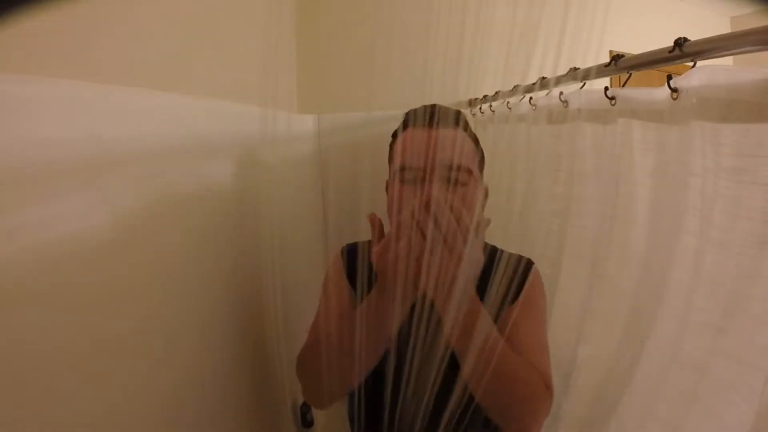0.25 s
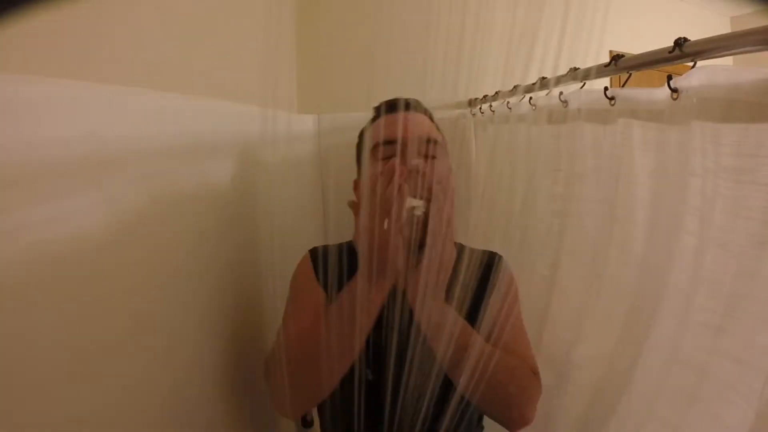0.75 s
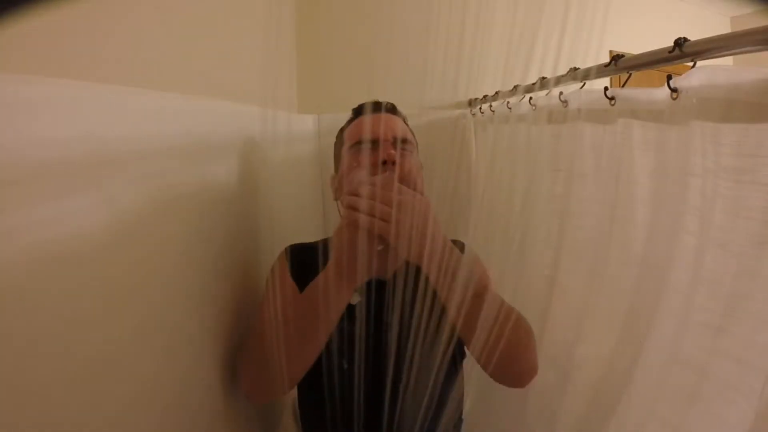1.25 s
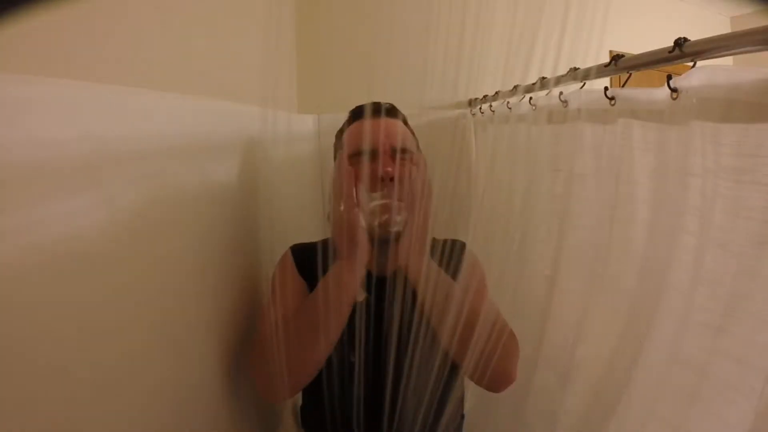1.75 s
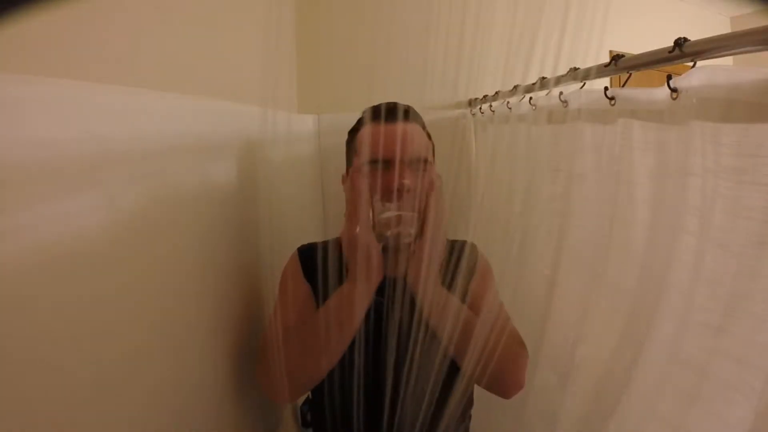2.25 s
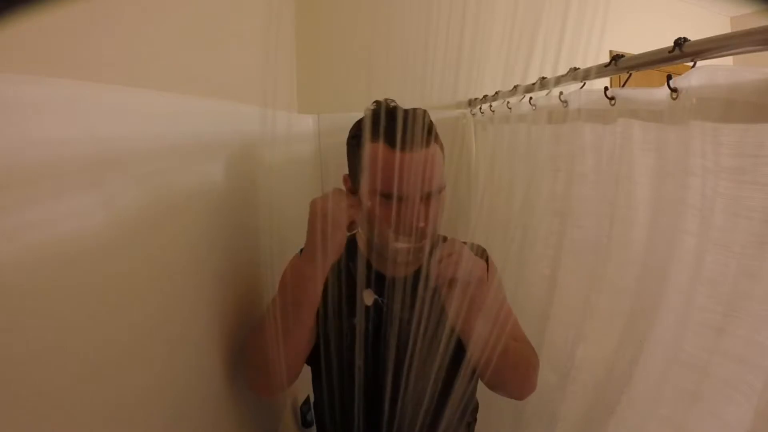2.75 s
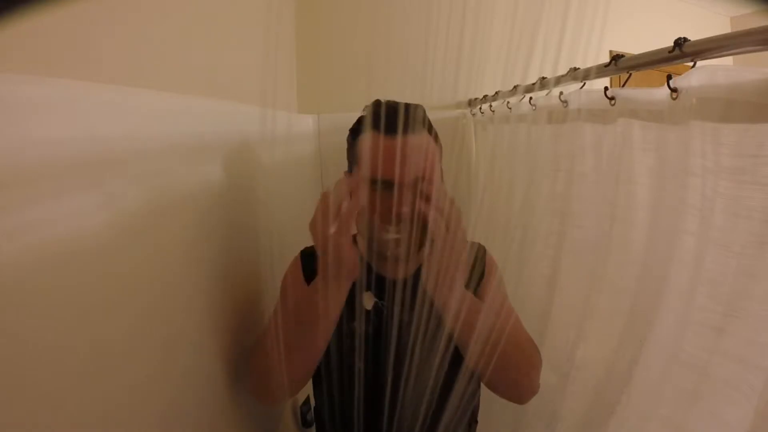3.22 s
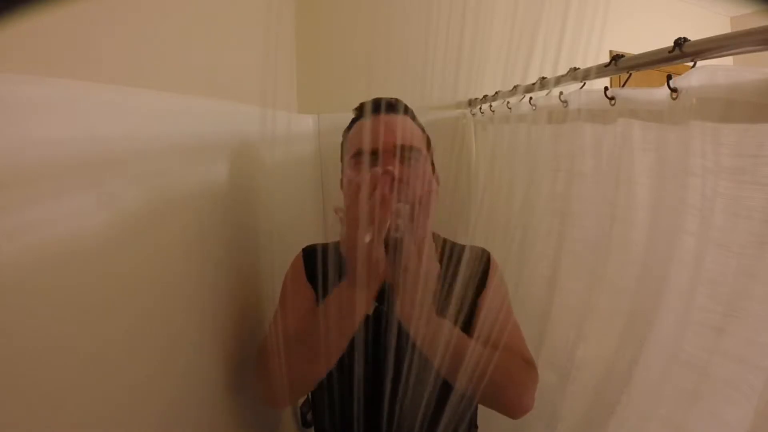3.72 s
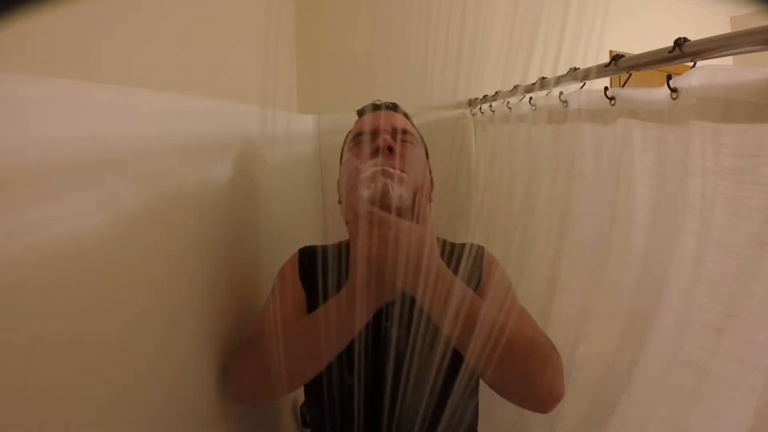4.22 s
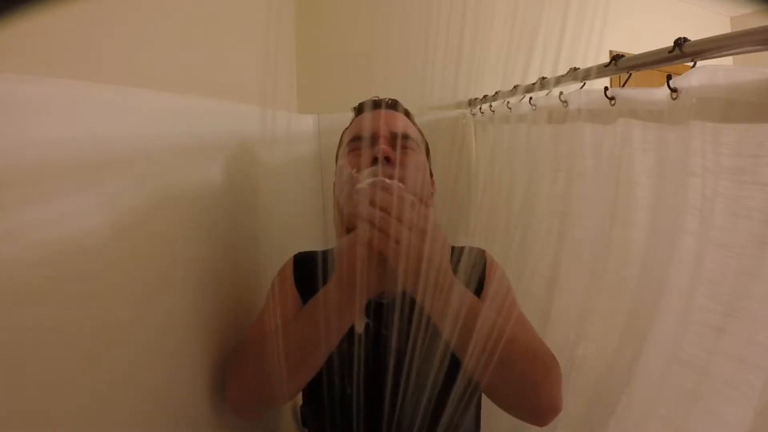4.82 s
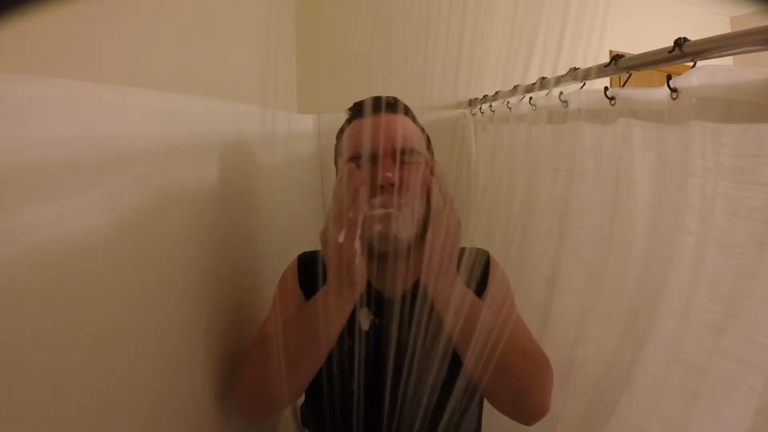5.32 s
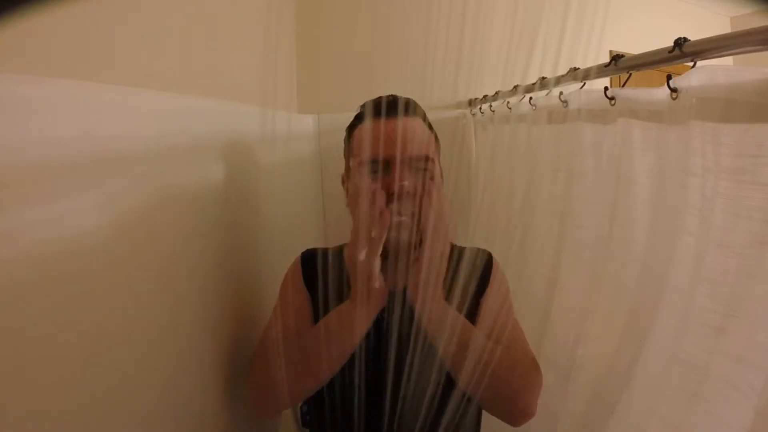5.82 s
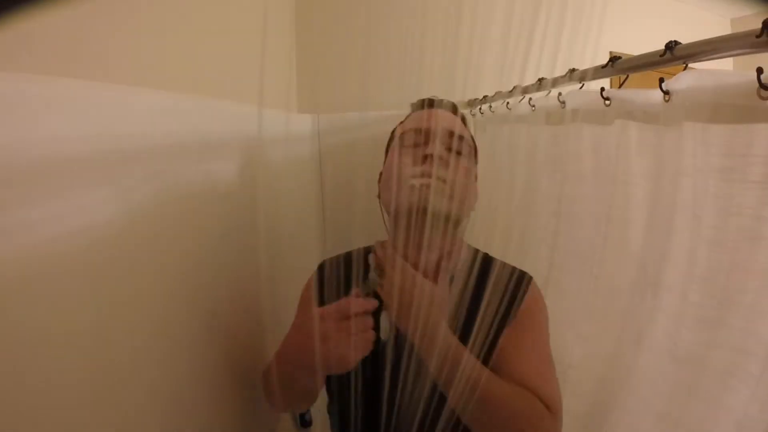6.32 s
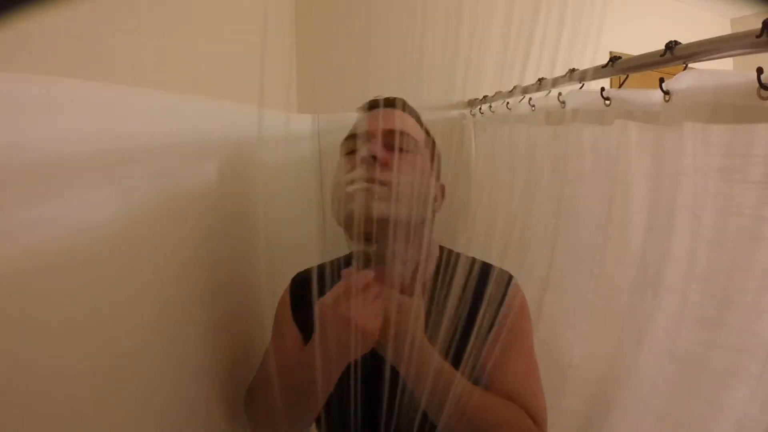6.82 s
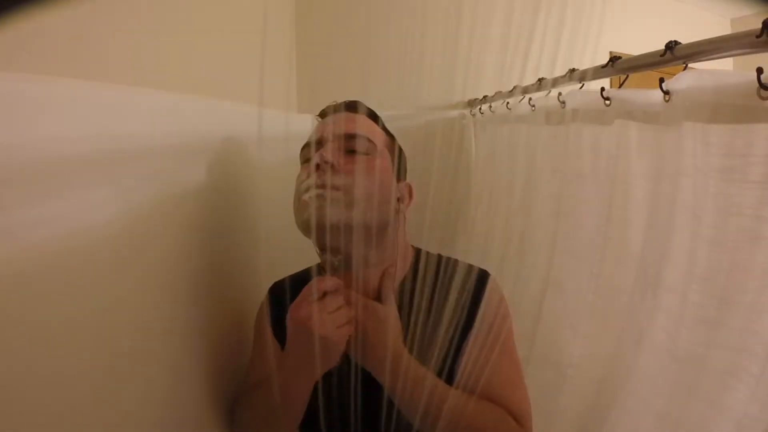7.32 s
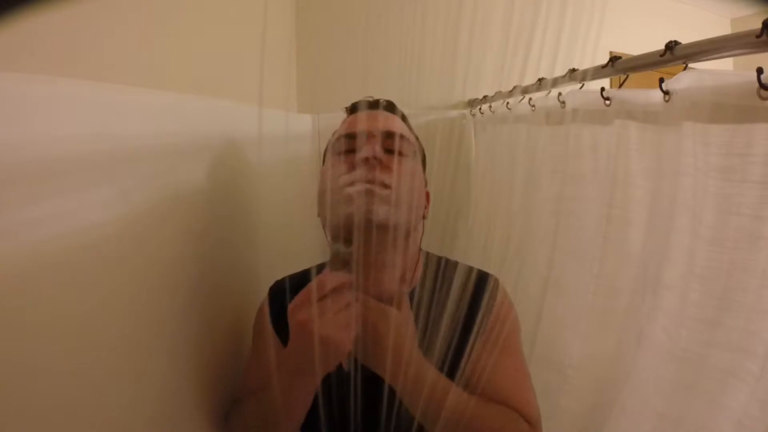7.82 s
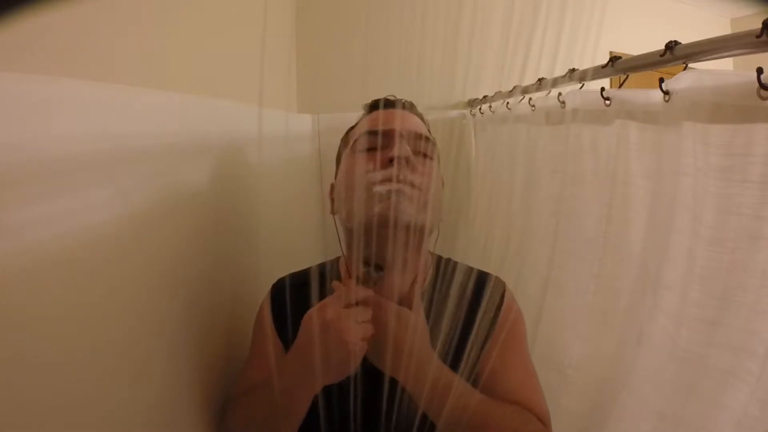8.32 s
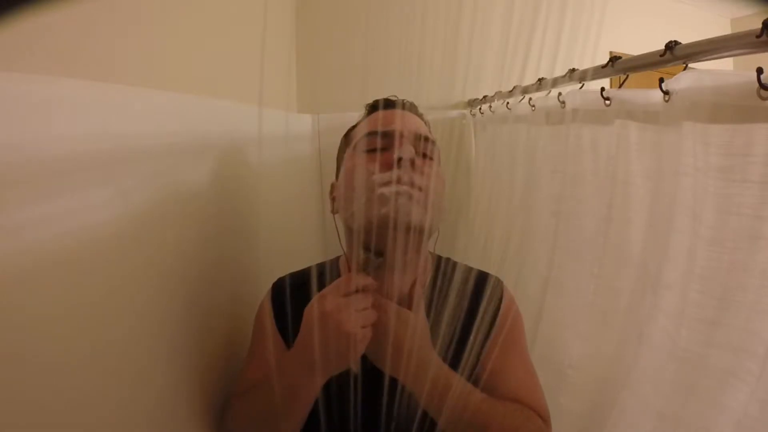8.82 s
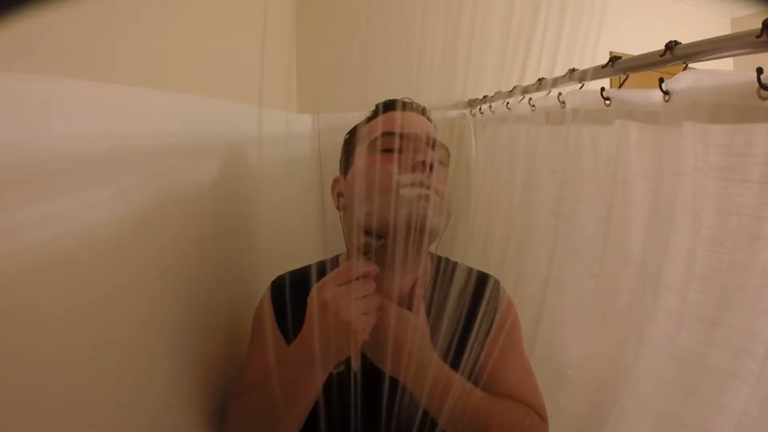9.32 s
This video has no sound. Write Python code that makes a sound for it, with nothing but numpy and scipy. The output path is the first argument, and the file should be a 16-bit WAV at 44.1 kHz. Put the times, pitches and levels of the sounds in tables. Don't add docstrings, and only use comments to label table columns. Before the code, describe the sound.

A shower runs without pause, heard from right at its head. The flow makes a dense hum and rushing hiss, strongest in the middle tones, with a low wavering throb beneath and thin steady whistles above. Water thrown off a man washing his face slaps wetly on the tub, mostly from about one to seven seconds, among tiny bright ticks. Small tiled bathroom, very close microphone.

```python
import sys
import numpy as np
from scipy import signal
from scipy.fft import rfft, irfft
from scipy.io import wavfile
from scipy.ndimage import uniform_filter1d

SR = 44100
rng = np.random.default_rng(int(sys.argv[2]) if len(sys.argv) > 2 else 0)


def store_pcm(level_fs):
    pcm = np.round(np.clip(level_fs, -1, 1) * 32767).astype(np.int16)
    wavfile.write(sys.argv[1], SR, np.atleast_2d(pcm).T)


def natural_amplitude(level_db):
    exponent = np.asarray(level_db, float) / 20
    return 10 ** exponent


N = 421155
BIN_HZ = np.arange(N // 2 + 1) * SR / N + 1e-3
FLOW_DB = -36.5

# frequency in Hz, width in Hz, level in dB.
WALL_MODES = [(62, 7, 5.6), (100, 11, -0.9), (123, 18, 15.2), (163, 16, 5.5), (185, 16, -6.1),
              (220, 23, 0.8), (287, 59, -7.5), (327, 26, 2.3), (401, 20, -5.7), (440, 33, -14.5),
              (498, 53, -13.0), (536, 14, -11.0), (596, 79, -20.5), (661, 38, -13.1), (731, 39, -16.3)]
# frequency in Hz, width in Hz, level in dB.
ARM_MODES = [(801, 32, -0.8), (833, 37, 5.0), (854, 18, 8.2), (897, 26, 2.1), (926, 34, 3.4),
             (998, 44, 2.0), (1056, 31, -0.4), (1113, 46, 10.2), (1142, 41, 14.4), (1165, 18, 10.8),
             (1200, 32, 16.0), (1257, 32, 17.8), (1302, 14, 2.7), (1330, 24, -1.1), (1365, 35, -2.1),
             (1396, 22, 1.5), (1453, 77, 7.0), (1511, 42, 4.1), (1566, 47, 3.0)]
# frequency in Hz, width in Hz, level in dB.
SHELL_MODES = [(1672, 47, 15.5), (1702, 25, 12.0), (1753, 7, 16.1), (1764, 21, 16.7), (1794, 60, 9.1),
               (1839, 27, 10.4), (1899, 112, 15.0), (1975, 19, 1.6), (2075, 48, 1.5), (2126, 25, 2.7),
               (2173, 27, 12.0), (2217, 26, -1.9), (2262, 20, 3.3), (2294, 17, 11.1), (2311, 29, 11.0),
               (2364, 28, 15.6), (2423, 40, 13.3), (2539, 53, 4.2), (2689, 81, -1.7), (2762, 23, -5.1),
               (2797, 7, -4.9), (2844, 80, -3.1)]
# frequency in Hz, width in Hz, level in dB.
PLATE_MODES = [(2983, 81, -3.4), (3072, 45, -10.9), (3208, 97, 2.3), (3295, 31, -3.1), (3338, 184, -0.8),
               (3438, 73, -2.7), (3512, 111, -2.3), (3635, 118, -0.1), (3806, 93, -0.5), (3889, 62, -7.7),
               (3959, 62, -8.9), (4068, 61, -0.9), (4131, 109, -5.9), (4251, 48, -10.1), (4371, 126, -3.1),
               (4446, 115, -4.3), (4706, 27, -22.5), (4936, 243, -15.8), (5061, 107, -13.6),
               (5211, 37, -13.5), (5259, 38, -11.8), (5322, 71, -15.2), (5492, 175, -11.4), (5626, 63, 1.6),
               (5733, 169, -13.1), (5963, 124, -9.8), (6014, 48, -9.8), (6260, 188, -10.5), (6316, 44, 2.5),
               (6458, 222, -10.8)]
# frequency in Hz, width in Hz, level in dB.
JET_MODES = [(6889, 214, -7.4), (7300, 600, -15.6), (7608, 34, -5.2), (7660, 300, -13.3), (7979, 37, -7.7),
             (8071, 24, -10.7), (8103, 269, -17.7), (8126, 41, -10.2), (8320, 65, -12.6), (8409, 21, -18.1),
             (8477, 69, -11.7), (8573, 46, -10.4), (8669, 51, -18.1), (8828, 84, -23.4), (8966, 72, -15.1),
             (9297, 399, -18.9), (9390, 66, -12.3), (9466, 35, -15.7), (9675, 87, -18.6),
             (9812, 133, -18.2), (9933, 75, -15.3), (10060, 70, -24.7), (10445, 600, -25.8),
             (11145, 600, -32.5), (11340, 40, -32), (11800, 70, -29), (11849, 22, -25.5),
             (11983, 91, -28.7), (12039, 30, -18.4), (12184, 24, -32.5), (12264, 40, -31.3),
             (12436, 167, -32.6)]
# frequency in Hz, width in Hz, level in dB.
WHISTLES = [
    (5625, 9.3, 0.93),
    (6317, 5.9, -1.1),
]
# frequency in Hz, width in Hz, depth in dB.
NODES = [(80, 14, -6), (245, 14, -3), (521, 9, -5), (1081, 18, -4.9), (1183, 12, -5), (1290, 10, -4),
         (1540, 12, -5), (1598, 22, -3), (1727, 80, -11.8), (1816, 10, -2.9), (2014, 30, -6.5),
         (2103, 12, -5), (2145, 10, -4), (2275, 12, -4), (2392, 12, -5), (2460, 14, -4), (4003, 24, -4),
         (4095, 14, -3), (4200, 26, -3.5), (4289, 28, -7), (4497, 80, -6.0), (6268, 32, -7.6),
         (12095, 70, -3), (12900, 300, -1.5)]
# time in seconds, level in dB.
SURGE = [
    (0, -1),
    (1.8, -2),
    (2.4, -0.9),
    (3.4, -0.9),
    (4.2, -1.6),
    (5.4, -1.4),
    (6.2, -1.5),
    (8, -1.4),
    (9.55, -1.7),
]
# time in seconds, lift of the arm in dB, lift of the shell in
# dB.
LIFTS = [(1.52, 3.5, 1), (1.67, 1.5, 1.5), (3.22, 0.5, 2), (3.43, 0, 0.5), (4.08, 1.5, 1),
         (4.79, -0.5, 2.5), (5.19, 2.5, 0.5), (5.36, 2.5, 0), (5.55, 1, 1.5), (5.85, 2.5, 2),
         (7.12, 3, -0.5), (8.4, 2, -1), (8.6, -0.5, 0.5), (9.17, 0.5, 0)]
# frequency in Hz, width in Hz.
SWAY_MODES = [
    (60.5, 5),
    (123, 9),
]
# time in seconds, peak in dB, half length in seconds.
LOW_SWELLS = [(0.2, -56, 0.131), (0.51, -57, 0.061), (0.63, -68.8, 0.04), (0.82, -63, 0.132),
              (1.06, -68.7, 0.032), (1.24, -61, 0.13), (1.59, -58, 0.093), (1.79, -66.8, 0.115),
              (1.96, -73, 0.025), (2.16, -60.0, 0.085), (2.56, -65.5, 0.056), (2.88, -68, 0.25),
              (2.99, -56, 0.047), (3.26, -63.6, 0.051), (3.4, -66.7, 0.052), (3.56, -71, 0.033),
              (3.65, -66, 0.044), (3.76, -60.6, 0.043), (4.04, -65, 0.168), (4.18, -58, 0.083),
              (4.41, -68, 0.046), (4.62, -59, 0.055), (4.72, -67.3, 0.04), (4.95, -67.9, 0.091),
              (5.25, -60, 0.086), (5.46, -62, 0.041), (5.55, -60, 0.056), (5.8, -58.2, 0.17),
              (6.33, -66.4, 0.25), (6.72, -66.3, 0.034), (6.94, -68, 0.115), (7.21, -57, 0.088),
              (7.39, -75, 0.025), (7.52, -56, 0.068), (7.9, -68.5, 0.25), (8.25, -70, 0.047),
              (8.43, -69.9, 0.047), (8.98, -64, 0.043), (9.06, -64.0, 0.105), (9.41, -64.3, 0.067)]
# time in seconds, peak in dB, half length in seconds.
HIGH_SWELLS = [(0.12, -47, 0.031), (0.26, -45, 0.03), (0.43, -51.5, 0.062), (0.58, -54, 0.025),
               (0.78, -51.0, 0.031), (0.91, -45, 0.02), (1.02, -54.9, 0.025), (1.1, -52, 0.027),
               (1.2, -48.4, 0.037), (1.43, -50.4, 0.04), (1.88, -50, 0.058), (2.11, -48.5, 0.11),
               (2.38, -42.5, 0.048), (2.48, -53, 0.02), (2.61, -49.8, 0.069), (2.84, -51.5, 0.036),
               (2.93, -48.5, 0.056), (3.12, -62, 0.025), (3.24, -48, 0.035), (3.43, -50, 0.072),
               (3.63, -44.5, 0.045), (3.75, -47, 0.029), (3.98, -46.5, 0.058), (4.1, -46, 0.03),
               (4.32, -51, 0.049), (4.45, -56, 0.027), (4.51, -49, 0.035), (4.73, -50.5, 0.11),
               (4.98, -52.2, 0.081), (5.11, -56, 0.025), (5.27, -56, 0.024), (5.45, -53, 0.114),
               (5.61, -50, 0.031), (5.71, -55, 0.025), (5.84, -53.2, 0.03), (6.02, -52.5, 0.11),
               (6.23, -54.4, 0.099), (6.51, -50, 0.055), (6.78, -53.9, 0.035), (6.94, -48, 0.037),
               (7.06, -52.2, 0.035), (7.19, -50.2, 0.055), (7.31, -50, 0.025), (7.4, -45.9, 0.042),
               (7.65, -53, 0.11), (7.89, -47.0, 0.031), (7.98, -53.4, 0.026), (8.05, -53, 0.03),
               (8.21, -46, 0.04), (8.4, -43.5, 0.071), (8.62, -51, 0.18), (8.85, -56.1, 0.045),
               (9.0, -64, 0.097), (9.18, -57, 0.114), (9.35, -51.3, 0.031), (9.45, -59, 0.026)]
# time in seconds, body in dB, fringe in dB, decay in seconds.
SLAPS = [(0.985, -56, -67, 0.02), (1.112, -54.5, -64, 0.02), (2.293, -53.5, -62.7, 0.035),
         (2.66, -56, -64, 0.022), (2.722, -49, -63.7, 0.022), (2.8, -52.3, -67.4, 0.022),
         (2.829, -53.8, -67.4, 0.012), (2.895, -47.8, -56.3, 0.016), (2.925, -53.5, -67.4, 0.02),
         (2.975, -52.2, -55.7, 0.02), (3.054, -59.1, -55.2, 0.037), (3.072, -52, -64, 0.028),
         (3.357, -53.6, -54.9, 0.022), (3.396, -50.9, -61.4, 0.021), (3.434, -52.3, -60.7, 0.021),
         (3.474, -53.4, -64.0, 0.012), (3.732, -55.5, -66, 0.02), (3.778, -51.5, -62, 0.035),
         (3.798, -56, -56.7, 0.035), (4.471, -53.5, -59.6, 0.043), (4.483, -52.7, -54.2, 0.023),
         (4.515, -57, -58, 0.03), (4.79, -52.5, -67.4, 0.018), (4.899, -61.3, -60.6, 0.016),
         (5.088, -55.4, -55.3, 0.035), (5.264, -61.3, -57.7, 0.019), (5.784, -55.8, -53, 0.036),
         (6.184, -55.5, -64.7, 0.023), (6.219, -59.1, -60.9, 0.028), (6.262, -55.7, -54.5, 0.014),
         (6.69, -57, -66, 0.02), (6.809, -61.3, -59.7, 0.031), (6.927, -55.7, -65.8, 0.021),
         (8.569, -58.8, -59.8, 0.032), (8.819, -59, -63, 0.033), (8.959, -60, -63, 0.043),
         (9.09, -54, -66, 0.02)]
# time in seconds, lower part in dB, upper part in dB, decay in seconds.
SPITS = [(1.084, -76.6, -77.2, 0.035), (1.735, -80, -76.5, 0.02), (1.885, -72, -82, 0.02),
         (2.379, -82.5, -79.3, 0.035), (2.472, -74.1, -77.4, 0.02), (2.657, -73.8, -83.2, 0.045),
         (2.781, -76.8, -80.1, 0.031), (2.839, -67.6, -77.3, 0.021), (2.969, -76.6, -80.0, 0.026),
         (3.048, -71.5, -82, 0.022), (3.176, -72.6, -76.3, 0.037), (3.418, -73.5, -77.7, 0.022),
         (3.621, -80.0, -77.8, 0.028), (3.895, -72.3, -78.3, 0.045), (3.914, -72.7, -74.7, 0.025),
         (4.685, -73.5, -76.6, 0.033), (4.729, -78, -80.2, 0.016), (4.779, -82.5, -79.4, 0.012),
         (5.099, -75.1, -78.3, 0.023), (5.164, -68.5, -72.9, 0.023), (5.204, -74.8, -85.6, 0.023),
         (5.26, -74.7, -76.7, 0.022), (5.344, -74.1, -72.6, 0.025), (5.552, -64.1, -71.7, 0.024),
         (5.596, -74.9, -73.8, 0.022), (5.752, -80, -77, 0.02), (6.004, -75.3, -76.4, 0.022),
         (6.349, -72.1, -75.3, 0.018), (6.532, -80, -77, 0.02), (6.859, -75.8, -79.2, 0.023),
         (7.468, -74.7, -78.4, 0.045), (7.614, -71.5, -79.8, 0.015), (7.879, -74.0, -76.3, 0.038),
         (7.912, -80, -77, 0.02)]
# frequency in Hz, density in dB per Hz.
SPRAY_COLOUR = [(20, -16), (78, -2), (300, -15), (600, -21.5), (800, -13.5), (2000, -4.5), (3000, -23),
                (4700, -50), (7000, -25), (10000, -27), (11500, -37), (12600, -30.5), (14300, -35),
                (15300, -41)]
# time in seconds, level in dB.
SCATTER = [
    (0.0, -75),
    (0.32, -85),
    (1.67, -84),
    (2.71, -64),
    (3.43, -73),
    (4.07, -73),
    (4.47, -68),
    (5.21, -73),
    (6.22, -77),
    (9.55, -80),
]


def fittings(surge_db):
    arm_db, shell_db = lifts()
    arm = surging(ringing(ARM_MODES, 0.18, 4.2), surge_db + arm_db + churn_db())
    shell = surging(ringing(SHELL_MODES, 0.18, 4.3), surge_db + shell_db + churn_db())
    wall = ringing(WALL_MODES[1:2] + WALL_MODES[3:], 0.89, 6.6)
    plate = ringing(PLATE_MODES, 0.47, 14)
    jets = ringing(JET_MODES, 0.62, 15)
    return wall + arm + shell + plate + jets + ringing(WHISTLES, 1.4, 4.3)


def ringing(modes, flicker_db, rate):
    power = np.zeros(len(BIN_HZ))
    for hz, width, db in modes:
        lowest, highest = max(hz - 12 * width, 0), hz + 12 * width
        near = slice(int(lowest * N / SR), int(highest * N / SR))
        detune = (BIN_HZ[near] ** 2 - hz ** 2) / (BIN_HZ[near] * width)
        power[near] += natural_amplitude(db) ** 2 / (1 + detune ** 2) ** 2
    drive = rng.standard_normal(N) * natural_amplitude(flicker_db * walk(rate))
    return irfft(rfft(drive) * np.sqrt(power), N)


def surging(x, db):
    slow_power = uniform_filter1d(uniform_filter1d(x ** 2, SR // 8), SR // 8)
    return x * np.std(x) / np.sqrt(slow_power) * natural_amplitude(db - np.mean(db))


def lifts():
    s, arm_db, shell_db = np.transpose(LIFTS)
    samples = np.arange(N)
    coarse = samples[::100]
    bell = np.exp(-((coarse / SR - s[:, None]) / 0.047) ** 2)
    return [np.interp(samples, coarse, db @ bell) for db in (arm_db, shell_db)]


def churn_db():
    return .5 * walk(12)


def walk(rate):
    k = int(SR / rate)
    held = np.repeat(rng.standard_normal(N // k + 1), k)
    return 1.14 * uniform_filter1d(uniform_filter1d(held, k), k)[:N]


def curve(table):
    s, *columns = np.transpose(table)
    return [np.interp(np.arange(N) / SR, s, c) for c in columns]


def sway():
    low = swells(LOW_SWELLS, rest_db=-78)
    high = swells(HIGH_SWELLS, rest_db=-58)
    out = np.zeros(N)
    for (hz, width), size, gain_db, slack in zip(SWAY_MODES, (low, high), (-2.2, -2.1), (.15, .16)):
        swing = ringing([(hz, width, 0)], 0, 5)
        swing = swing / np.std(swing)
        steady = swing * np.sqrt(2) / (np.abs(signal.hilbert(swing)) + slack)
        throb_db = 1.2 * walk(20)
        out += natural_amplitude(gain_db + throb_db) * size * steady
    return out


def swells(swell_rows, rest_db):
    s, db, half_s = np.transpose(swell_rows)[:, :, None]
    t = np.arange(0, N / SR + .01, .005)
    size = natural_amplitude(rest_db) + np.sum(natural_amplitude(db) * np.exp(-((t - s) / half_s) ** 2), axis=0)
    return np.interp(np.arange(N) / SR, t, size)


def mount(x):
    power = np.ones(len(BIN_HZ))
    for hz, width, db in NODES:
        detune = (BIN_HZ ** 2 - hz ** 2) / (BIN_HZ * width)
        power *= 1 - (1 - natural_amplitude(db) ** 2) / (1 + detune ** 2)
    return irfft(rfft(x) * np.sqrt(power), N)


def slaps():
    s, body_db, fringe_db, decay_s = np.transpose(SLAPS)
    body = bursts(s, body_db + 2.3, .5 * decay_s, 3100, 4450, rise_s=.0004, tail_db=-11)
    fringe = bursts(s, fringe_db + 1.4, .42 * decay_s, 4900, 7200, rise_s=.0006, tail_db=-14)
    return body + fringe


def spits():
    s, lower_db, upper_db, decay_s = np.transpose(SPITS)
    when, size = rng.random((90, 2)).T
    faint = bursts(when * N / SR, -84 + 4.0 * size, .012, 9500, 15000, rise_s=.001, tail_db=-16)
    lower = bursts(s, lower_db + 3.8, .4 * decay_s, 9000, 11700, rise_s=.0008, tail_db=-13)
    upper = bursts(s, upper_db + 3.0, .4 * decay_s, 11700, 14800, rise_s=.0008, tail_db=-14)
    return faint + lower + upper


def bursts(times, db, decay_s, lo_hz, hi_hz, rise_s, tail_db):
    t = np.arange(int(.3 * SR)) / SR
    tiles = natural_amplitude(tail_db) * np.exp(-t / 0.041)
    out = np.zeros(N + len(t))
    for s, level_db, tau in np.broadcast(times, db, decay_s):
        shape = (1 - np.exp(-t / rise_s)) * (np.exp(-t / tau) + tiles)
        patter = natural_amplitude(15 * uniform_filter1d(rng.standard_normal(len(t)), size=100))
        burst = shape * band(rng.standard_normal(len(t)) * patter, lo_hz, hi_hz)
        start = int(s * SR)
        out[start:start + len(t)] += natural_amplitude(level_db) * burst / np.std(burst[:SR // 70])
    return out[:N]


def band(x, lo_hz, hi_hz):
    return signal.sosfilt(signal.butter(3, [lo_hz, hi_hz], "band", fs=SR, output="sos"), x)


def tap():
    t = np.arange(N) / SR - 5.940
    knock = np.sin(2 * np.pi * 650 * t) * np.exp(-np.abs(t) / .0012) * (t > 0)
    edge = natural_amplitude(-12) * np.exp(-(t * SR / .7) ** 2)
    return natural_amplitude(-41) * (knock + edge)


def spray():
    hz, db = np.transpose(SPRAY_COLOUR)
    colour = natural_amplitude(np.interp(np.log(BIN_HZ), np.log(hz), db))
    drop_size = natural_amplitude(1.7 * rng.exponential(size=N))
    drops = rng.standard_normal(N) * drop_size * natural_amplitude(0.73 * walk(25))
    hiss = irfft(rfft(drops / np.std(drops)) * colour, N)
    scatter_db, = curve(SCATTER)
    treble = hiss - signal.sosfiltfilt(signal.butter(2, 3000, fs=SR, output="sos"), hiss)
    lift = natural_amplitude(.32 * (scatter_db - np.mean(scatter_db)))
    return hiss + treble * (lift - 1)


def scene():
    surge_db, = curve(SURGE)
    flow = natural_amplitude(FLOW_DB) * mount(fittings(surge_db) + spray())
    struck = mount(sway() + slaps())
    return (flow + struck + spits() + tap())[None]


def low_pass(x):
    return signal.sosfilt(signal.butter(12, 15670, fs=SR, output="sos"), x)


def record(dry):
    cut = signal.sosfilt(signal.ellip(12, .2, 60, 15270, fs=SR, output="sos"), dry)
    return low_pass(cut)


dry = scene()
out = record(dry)
store_pcm(out)
```